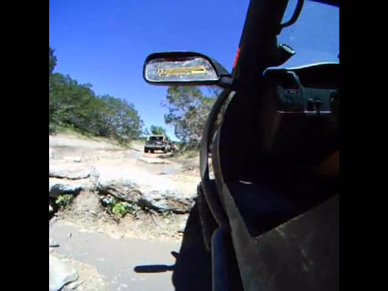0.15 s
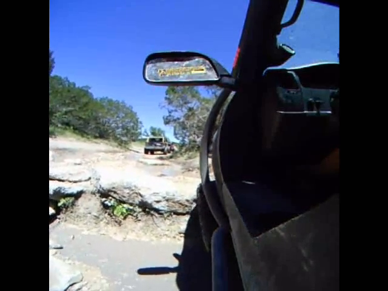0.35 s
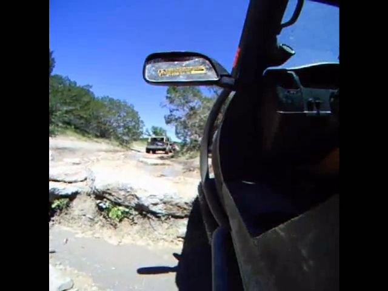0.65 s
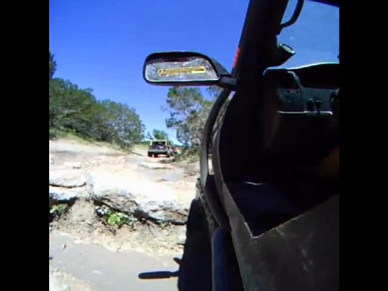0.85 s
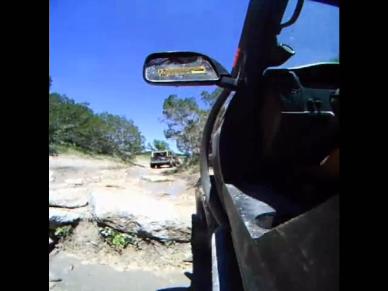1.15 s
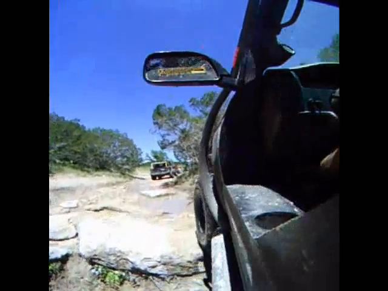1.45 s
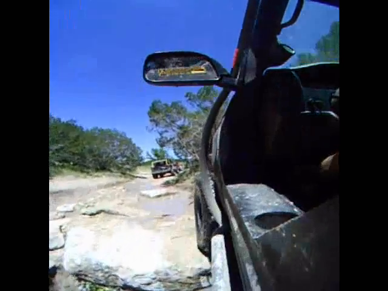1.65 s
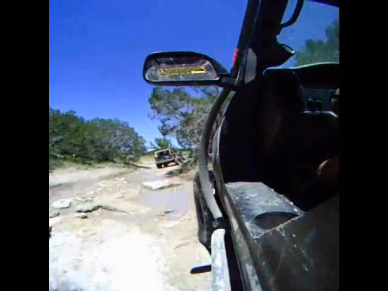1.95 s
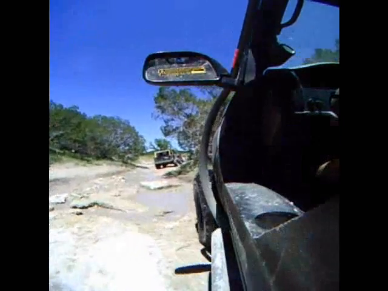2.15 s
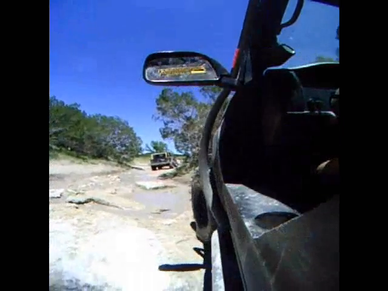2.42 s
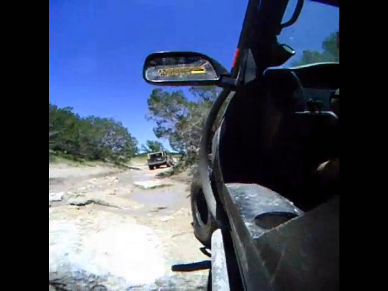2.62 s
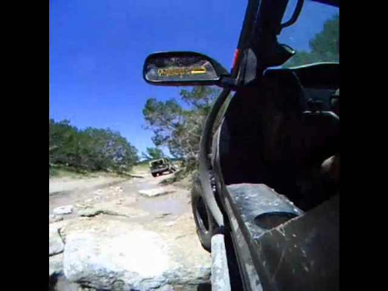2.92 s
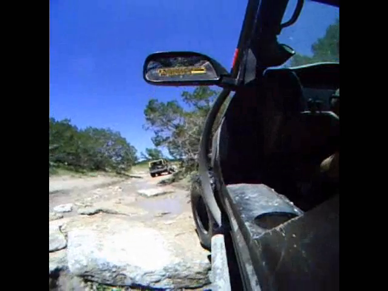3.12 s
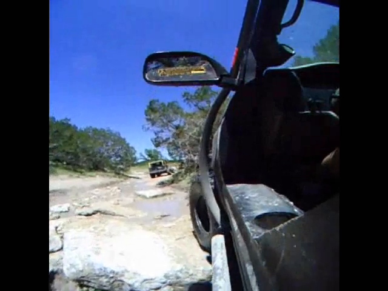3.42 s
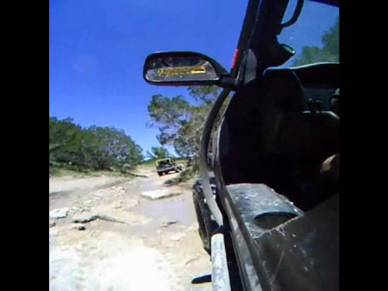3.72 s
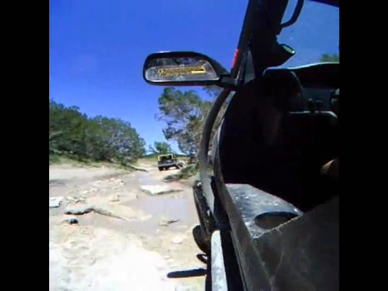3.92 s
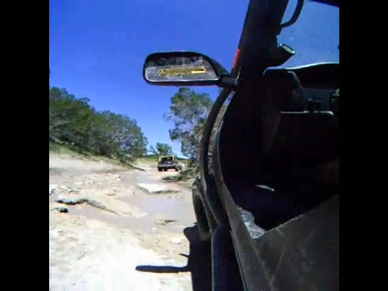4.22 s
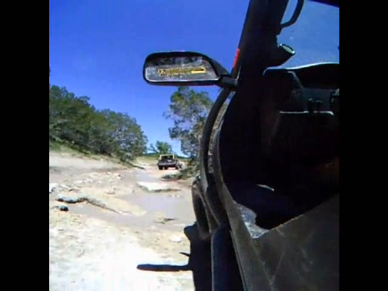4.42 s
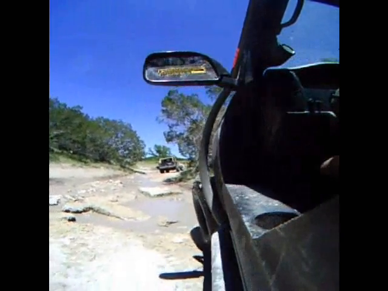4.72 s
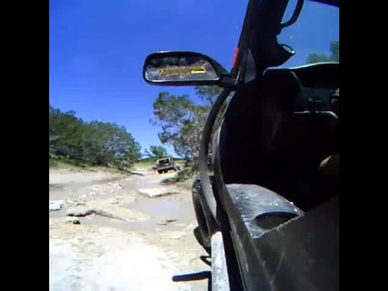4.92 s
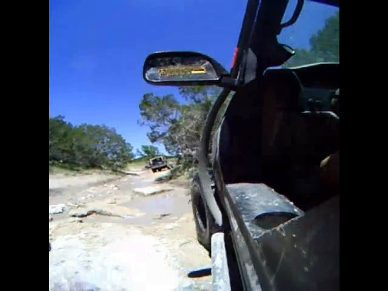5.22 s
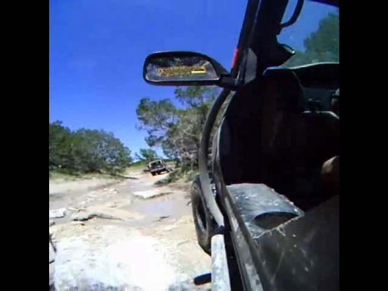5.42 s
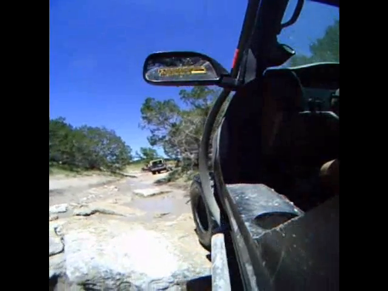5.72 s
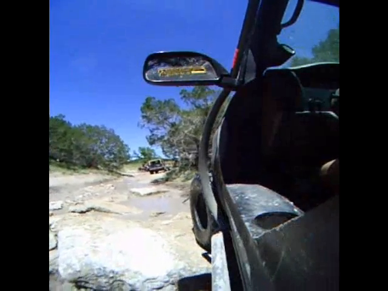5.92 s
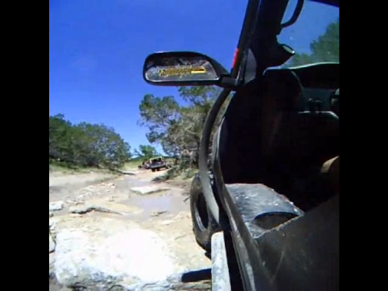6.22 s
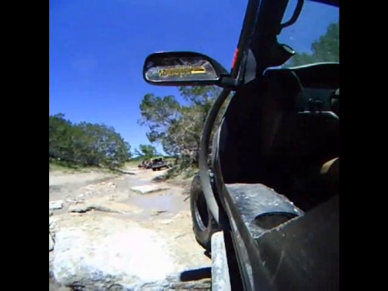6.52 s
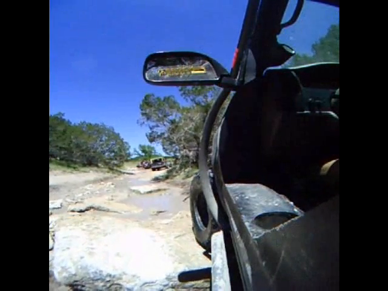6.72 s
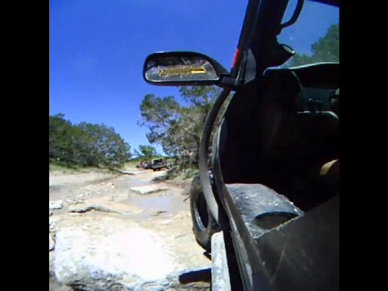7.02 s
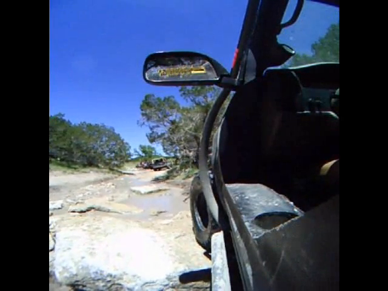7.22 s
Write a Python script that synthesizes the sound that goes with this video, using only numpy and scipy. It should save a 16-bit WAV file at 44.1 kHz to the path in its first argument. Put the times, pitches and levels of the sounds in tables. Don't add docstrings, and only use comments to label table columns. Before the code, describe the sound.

An off-road vehicle crawls over rock ledges, engine surging and sagging, body humming and thudding, with hard metallic clunks, heard through a cheap gritty microphone.

```python
import sys
import numpy as np
from scipy import signal
from scipy.fft import rfft, irfft, next_fast_len
from scipy.io import wavfile
from scipy.ndimage import uniform_filter1d, map_coordinates

SR = 44100
rng = np.random.default_rng(int(sys.argv[2]) if len(sys.argv) > 2 else 0)


def to_wav(sig):
    pcm = np.clip(np.atleast_2d(sig), -1, 1) * 32767
    pcm = np.round(pcm).astype(np.int16)
    wavfile.write(sys.argv[1], SR, pcm.T)


def ratio(d):
    e = np.asarray(d, float) / 20
    return 10 ** e


N = 324344
SAMPLE_HZ = 7999

# t/s, swing of the mount/dB, suspension heave/dB
CRAWL = [(0, -32, -39), (.18, -55, -48.5), (.5, -43, -41), (1, -55, -39), (1.5, -34.5, -45.5),
         (2.4, -56.5, -48), (2.7, -45.5, -45.5), (3, -46, -41.5), (4.3, -35, -48.5), (4.6, -56, -52.5),
         (4.95, -45, -46), (5.2, -59, -43), (5.85, -43.5, -41.5), (6.25, -43.5, -49.5), (6.45, -49, -56.5),
         (6.8, -47.5, -59), (7, -42.5, -54.5), (7.35, -42.5, -58.5)]


def unit(x):
    return x / np.sqrt(np.mean(x ** 2) + 1e-20)


def curves(rows):
    s, *cols = np.transpose(rows)
    return [np.interp(np.arange(N) / SR, s, c) for c in cols]


def wobble(rate):
    knots = rng.standard_normal(int(N * rate / SR) + 4)
    return map_coordinates(knots, [np.arange(N) * rate / SR])


def filtered(x, response):
    m = next_fast_len(len(x) + 8192)
    return irfft(rfft(x, m) * response(np.fft.rfftfreq(m, 1 / SR)), m)[:len(x)]


def colour(points):
    f, v = np.transpose(points)
    return lambda hz: ratio(np.interp(np.log(hz + 1), np.log(f + 1), v))


def modes(table):
    def response(f):
        total = 0
        for k, (centre, width, db) in enumerate(table):
            resonance = 1j * f * width / (centre * centre - f * f + 1j * f * width)
            total = total + (-1) ** k * ratio(db) * resonance
        return total
    return response


def noise(response):
    return unit(filtered(rng.standard_normal(N), response))


def envelopes(rows, attack, t60):
    s, db, length, swell_db = np.transpose(rows)[:, :, None]
    t = np.arange(0, N, 64) / SR
    since = t - s
    length = np.maximum(length, .01)
    rise = np.clip(since / attack, 0, 1)
    hold_db = swell_db * np.clip(since / length, 0, 1)
    release_db = -60 * np.maximum(since - length, 0) / t60
    each = rise * ratio(db + hold_db + release_db)
    return np.interp(np.arange(N) / SR, t, each.sum(axis=0))


def mount(jolts):
    # t/s, f/Hz
    clamp_pitch = [(0, 89.7), (.18, 92.86), (.38, 90), (.88, 89.56), (1.08, 95.7), (1.21, 95.6), (1.39, 91),
                   (1.85, 92.8), (1.95, 90.3), (2.27, 92.53), (2.46, 87.2), (2.7, 91.46), (3.3, 94.5),
                   (3.45, 87.66), (3.73, 87.4), (3.82, 90.54), (4.3, 91.23), (7.35, 90.51)]
    hz, = curves(clamp_pitch)
    phase = 2 * np.pi * np.cumsum(hz * (1 + 0.008 * wobble(12))) / SR
    idle = ratio(curves(CRAWL)[0] + 2.67 * wobble(14))
    swing = uniform_filter1d(idle + jolts * ratio(0.46 * wobble(22)), size=SR // 55)
    overtone = ratio(-36 + 3.7 * wobble(30)) * np.sin(2 * phase)
    return np.sqrt(2) * swing * (np.sin(phase) + overtone)


def vehicle(jolts):
    # t/s, firing rate/Hz, firing tone/dB, load/dB
    engine = [(0, 50.06, -57.5, -64.5), (.24, 55.3, -38.5, -65.5), (.45, 57.95, -37, -61),
              (1.3, 47.86, -39, -64.5), (1.6, 46, -52, -61.5), (2.45, 41.18, -54, -74), (2.7, 47, -45, -65),
              (3.03, 64.07, -42, -56.5), (3.21, 70.2, -48, -54), (3.4, 60.5, -36.5, -51),
              (3.72, 54.18, -37.5, -60), (3.89, 56.02, -37, -59), (4.5, 43.95, -66, -72),
              (4.83, 50.83, -50, -67.5), (5.4, 75.72, -40.5, -58), (5.71, 69.16, -38.5, -60),
              (6.5, 40.04, -59, -69.5), (7.35, 32.67, -77, -78.5)]
    # t/s, heave/dB
    wheel_landings = [(.25, -41.5), (5.051, -45.5), (5.34, -42), (0.811, -39), (1.279, -37.5), (1.8, -33),
                      (1.864, -20.5), (2.241, -45), (3.45, -25), (3.73, -28.5), (3.8, -44), (3.949, -35),
                      (4.149, -39.5), (5.971, -40)]
    # f/Hz, level/dB per Hz
    heave_colour = [(8, -22.5), (20, -10), (50, -10.5), (62, -7), (68, -8), (75, -13.5), (100, -20),
                    (115, -26.5), (150, -35), (190, -120)]
    # f/Hz, width/Hz, level/dB
    pan_modes = [(138.4, 31, -8), (176.8, 3.1, 6), (226.3, 21.2, 0), (282.7, 36.5, -4.5), (328, 19, -6),
                 (416.6, 69, -8), (529.2, 18, -3), (657, 220, -15.5)]
    # f/Hz, width/Hz, level/dB
    panel_modes = [(776, 14, -4.5), (926.6, 39.5, -2.5), (1092, 96, -8.5), (1258, 50, -1.5),
                   (1451, 84, -10.5), (1686, 210, -12), (1827, 9, 0.5), (1918, 44, -4.5), (2526, 166, -7),
                   (2854, 360, -7.5), (2900, 190, -5.5), (3324, 89, -16)]
    landing_attack_s, landing_t60_s = 0.0242, 0.392
    pan_ring_s = 0.05

    hz, firing_db, load_db = curves(engine)
    phase = 2 * np.pi * np.cumsum(hz) / SR
    firing = np.sqrt(2) * ratio(firing_db + 2.3 * wobble(8)) * np.sin(phase)

    swells = [(s, db, landing_attack_s, 0) for s, db in wheel_landings]
    landings = envelopes(swells, landing_attack_s, landing_t60_s)
    crawling = ratio(curves(CRAWL)[1] - 2.5 + 2.4 * wobble(9.9))
    heave = (crawling + landings) * noise(colour(heave_colour))

    beat = ratio(1.5 * np.sin(phase) + 1.2 * wobble(15))
    shaken = jolts ** 1.225
    lingering = filtered(shaken, lambda f: 1 / (1 + 2j * np.pi * f * pan_ring_s))
    pan_level = ratio(load_db + 2 + 1.2 * wobble(7.3)) + ratio(-31.5) * lingering
    pan = pan_level * unit(beat * noise(modes(pan_modes)))
    panel_level = ratio(load_db) + ratio(-38.5) * shaken
    panels = panel_level * unit(beat * ratio(1.2 * wobble(60)) * noise(modes(panel_modes)))
    return firing + heave + pan + panels


def clunks():
    # t/s, peak/dB, thud/dB, brightness/dB, rail ring/dB
    blows = [(0, -58, -7, 0, -11), (0.459, -55, 1, -22, -3), (0.393, -48, -3, -19, 4),
             (0.755, -58, 11, -30, -21), (1.618, -46.5, -14, -22, -15), (1.656, -39.5, 0, 3, -1.5),
             (1.764, -60.5, 15.5, -4, -11), (1.811, -41, -0.5, -4, -11), (1.868, -42.5, 7.5, -16, -4),
             (2.4, -54, -18, 0, -32), (3.355, -46.5, -8, 0, -6), (3.492, -28, -28, 1, -39),
             (3.691, -34.5, -3, -7.5, -26), (3.727, -15.5, -13, 5, -21.5), (3.789, -19.5, -9, 4, -14),
             (3.855, -17, -12.5, 5, -22.5), (3.905, -31, -0.5, 2, -18), (4.039, -45, -16, -6, -12),
             (4.428, -51, 3, -28, 5), (5.382, -44.5, -21, -27, -9)]
    # f/Hz, width/Hz, level/dB
    sill_modes = [(776, 12, -2), (870, 64, -7), (1099, 67, -1), (1260, 34.4, 4.5), (1453, 45, 0),
                  (1456, 73, -7.5), (1730, 88, -5), (1924, 22, 0), (2495, 217, -4), (2684, 120, 1),
                  (2748, 200, -4), (3644, 144, -22)]
    # f/Hz, width/Hz, level/dB
    frame_modes = [(172, 53, -6), (231.7, 7.6, 6.5), (277.7, 19, 2), (322, 120, -12.5), (498, 74, -9.5),
                   (660, 900, -19.5)]
    rail_hz, rail_t60_s, rail_beat_hz, rail_beat_depth = 409, 0.41, 8.3, 0.55
    clunk_t60_s, thud_t60_s, treble_t60_s = 0.15, 0.18, 0.37

    out = np.zeros(N + SR)
    t = np.arange(SR // 2) / SR
    rail = np.sin(2 * np.pi * rail_hz * t) * ratio(-60 * t / rail_t60_s) * (1 - np.exp(-t / 0.006))
    rail *= 1 - rail_beat_depth * np.sin(np.pi * rail_beat_hz * t) ** 2
    fade = ratio(-60 * t / clunk_t60_s) * (1 - np.exp(-t / 0.0029))
    longer = ratio(60 * t / clunk_t60_s - 60 * t / thud_t60_s)
    for s, db, thud_db, bright_db, rail_db in blows:
        scrape = fade * rng.standard_normal((2, len(t)))
        tilt = colour([(800, -bright_db), (3000, bright_db)])
        dulling = filtered(scrape[0], lambda f: f > 2200) * (ratio(-60 * t / treble_t60_s) - 1)
        ring = filtered(scrape[0] + dulling, lambda f: tilt(f) * modes(sill_modes)(f))
        thud = filtered(scrape[1] * longer, modes(frame_modes))
        blow = ring / np.max(abs(ring))
        blow = blow + ratio(thud_db) * thud / np.max(abs(thud)) + ratio(rail_db) * rail
        out[round(s * SR):][:len(t)] += ratio(db) * blow
    return out[:N]


def chatter(x):
    # t/s, peak/dB
    lingers = [(2.3033, -55), (2.401, -53), (2.442, -56), (2.4581, -60), (2.535, -55.5), (2.6246, -53),
               (2.687, -53), (4.3881, -51.5), (4.4106, -54), (4.4904, -53), (4.5163, -51), (4.537, -57),
               (4.558, -64), (4.577, -56), (4.606, -52), (4.626, -54), (4.6493, -56), (4.667, -55),
               (4.6774, -55), (4.6947, -58), (4.73, -55), (4.751, -58), (4.777, -60), (5.0319, -53),
               (6.4224, -49), (6.4795, -49), (6.591, -50), (6.8137, -50.5), (6.853, -51.5), (6.9546, -52)]
    # f/Hz, level/dB per Hz
    glitch_colour = [(300, -26), (1000, -7.5), (2000, -4), (3000, 1.5), (4000, -1)]
    code_step, linger_s = .009, 0.0036

    t = np.arange(N) / SR
    code = x / code_step + .5 + 0.18 * wobble(3)
    on_step = np.exp(-((code % 1 - .5) / .06) ** 2)
    outer_db = -7 * (abs(code - .5) > .5)
    size = on_step * ratio(outer_db + 2 - 49 + 0.89 * np.tanh(2 * wobble(110)))
    for s, db in lingers:
        size[(t >= s) & (t < s + linger_s)] = ratio(db)
    flips = rng.choice([-1., 1.], N)[(t * SAMPLE_HZ).astype(int)]
    return filtered(size * flips, colour(glitch_colour))


def rattles():
    # t/s, peak/dB
    ticks = [(1.905, -21), (1.9147, -25), (1.9254, -26), (1.9384, -32), (1.948, -30), (1.96, -24.5),
             (1.979, -25), (1.9893, -25), (2.003, -28.5), (2.023, -29.5), (3.517, -29.5), (3.5349, -37),
             (3.5475, -36), (3.5593, -37), (3.6555, -41)]
    out = np.zeros(N + SR)
    t = np.arange(SR // 20) / SR
    for s, db in ticks:
        out[round(s * SR):][:len(t)] += ratio(db + 1.0 - 60 * t / 0.03) * rng.standard_normal(len(t))
    return filtered(out[:N], modes([(3460, 360, 3), (1810, 1200, -5.5)]))


def scene():
    # t/s, strength/dB, length/s, swell over that length/dB
    ledges = [(-0.003, -48, 0.0086, 9), (0.285, -37, 0.15, 2.5), (0.514, -39.5, 0.33, -2),
              (0.752, -22, 0.099, -8.0), (0.898, -38, 0.079, 3), (1.041, -54.5, 0.024, 14.5),
              (1.108, -49.5, 0.016, 20.5), (1.211, -33, 0.1, -1.5), (1.44, -50, 0.37, 1.5),
              (1.638, -22, 0.082, -7.5), (1.75, -36, 0.057, 4.5), (1.858, -10, 0.21, -9.5),
              (2.082, -31.5, 0.29, -13.5), (2.504, -31, 0.034, -14), (2.99, -35, 0.14, 7),
              (3.172, -51, 0.031, 14), (3.297, -28, 0.036, -5), (3.37, -30.5, 0.2, 13.5),
              (3.66, -39, 0.055, 17.5), (3.748, -16, 0.11, -4), (3.89, -21.5, 0.06, -9),
              (3.97, -24.5, 0.115, -20), (4.139, -25.5, 0.073, -13), (5.065, -56, 0.045, -25),
              (5.21, -39.5, 0.12, 4.5), (5.348, -28.5, 0.21, 1.5), (5.57, -27.5, 0.2, -12),
              (5.92, -24, 0.016, -6.5), (6.041, -38.0, 0.098, 0), (6.495, -41.5, 0.041, -5)]
    jolts = envelopes(ledges, attack=.046, t60=0.15)
    return (mount(jolts) + vehicle(jolts) + clunks() + rattles())[None]


def top_cut(x):
    return signal.sosfilt(signal.butter(12, 13220, fs=SR, output="sos"), x)


def record(dry):
    # f/Hz, level/dB per Hz
    hiss_colour = [(100, 16), (600, -5.5), (2000, -6), (3000, -5.5), (4000, -13)]
    block_hz, drift_hz = 30.05, 13.76

    x = dry[0]
    hiss = ratio(-62.5) + ratio(-31) * abs(x)
    x = x + chatter(x) + hiss * noise(colour(hiss_colour))
    x = filtered(x, lambda hz: hz < SAMPLE_HZ / 2)
    t = np.arange(N) / SR
    block_start = np.floor(t * block_hz + .05) / block_hz
    clock = t * SAMPLE_HZ + block_start * drift_hz
    held = np.interp(t - clock % 1 / SAMPLE_HZ, t, x)
    held = filtered(held, colour([(12850, 0), (12950, -30), (13200, -34), (13230, -90)]))
    return top_cut(held[None])


dry = scene()
out = record(dry)
to_wav(out)
```